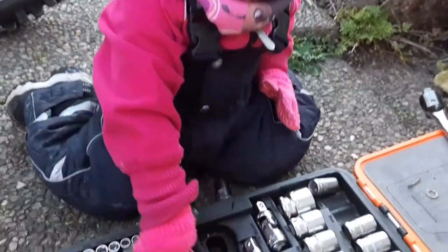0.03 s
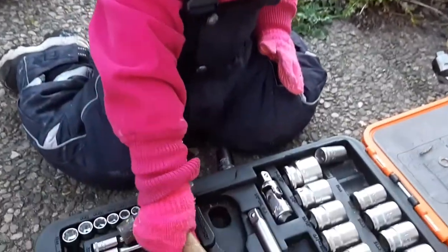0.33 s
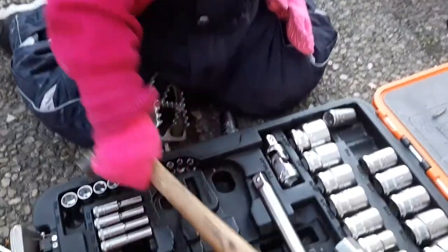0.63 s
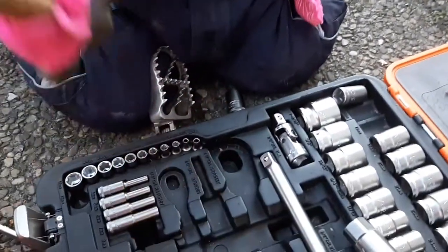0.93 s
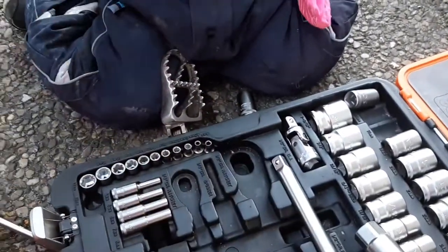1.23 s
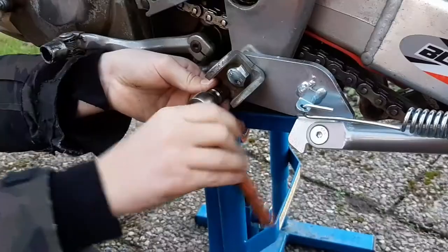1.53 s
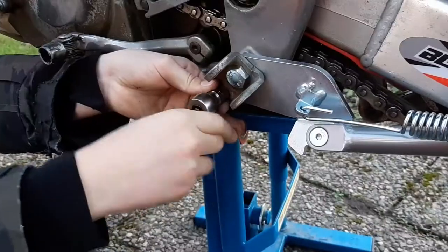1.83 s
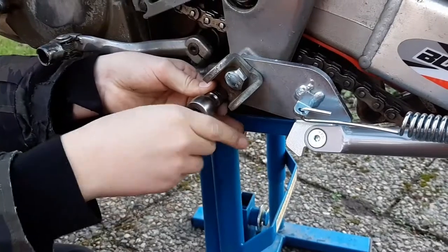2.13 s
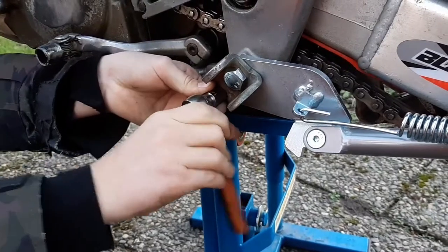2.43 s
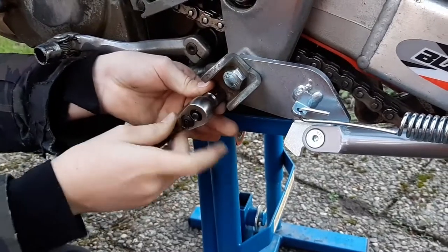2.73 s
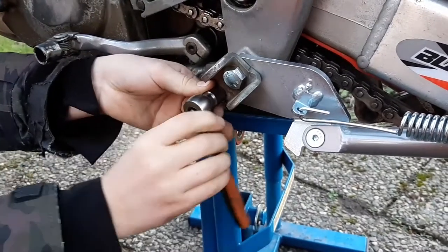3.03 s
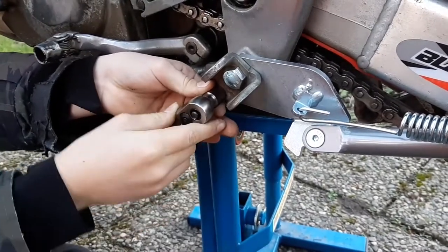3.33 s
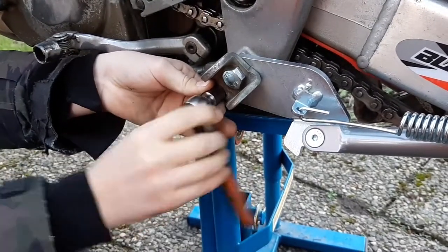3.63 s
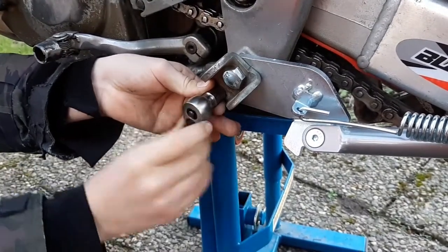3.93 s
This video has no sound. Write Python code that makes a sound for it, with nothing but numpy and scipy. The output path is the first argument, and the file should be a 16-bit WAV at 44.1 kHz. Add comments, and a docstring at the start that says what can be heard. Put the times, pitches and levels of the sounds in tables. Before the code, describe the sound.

A ratchet wrench clicking on a bolt outdoors is the main sound. First, a wooden handle knocks loudly and scrapes in a plastic case until 0.6 seconds, with steel clinks then and near 1.2. From 1.5 a distant engine drones. Quick runs of clicks come at about 1.8, 2.5, 3.2 and 3.9 seconds, the first three with a faintly ringing socket. The wrench knocks once at 3.7.

```python
"""Outdoors on paving, a wooden handle knocks in a plastic socket case, over quiet air and a thin hiss.
Steel pieces clink, the handle scrapes, and more clinks follow. At about 1.5 s the scene changes:
a distant engine drones, and a ratchet wrench on a bolt swings back four times. On each swing its
pawl (a small sprung catch) snaps over the teeth; in the first three a loose socket rings too.
Just before the last swing, the wrench knocks once as it takes up its slack."""
import sys
import numpy as np
from scipy.fft import rfft, irfft, next_fast_len
from scipy.io import wavfile
from scipy.ndimage import map_coordinates

SR = 44100
rng = np.random.default_rng(int(sys.argv[2]) if len(sys.argv) > 2 else 0)


def generate_wav(sig):
    """Save sig (samples, or channels by samples) to the path in sys.argv[1] as 16-bit PCM at SR."""
    pcm = np.round(np.clip(np.atleast_2d(sig).T, -1, 1) * 32767).astype(np.int16)
    wavfile.write(sys.argv[1], SR, pcm)


N = 176400
T = np.arange(SR // 3) / SR  # the clock for one short sound, in seconds


def amp(db):
    """Turn decibels into a number to multiply by."""
    return 10 ** (np.asarray(db) / 20)


def unit(x):
    """Scale a sound to an average strength (rms) of 1."""
    return x / np.sqrt(np.mean(x ** 2) + 1e-20)


def along(points, hz):
    """Read between the rows of a (frequency, value) table, on a log frequency scale."""
    f, value = np.transpose(points)
    return np.interp(np.log(hz + 1), np.log(f + 1), value)


def curve(rows):
    """Join (time, value) rows with straight lines, one value per sample."""
    return np.interp(np.arange(N) / SR, *np.transpose(rows))


def wobble(rate):
    """A smooth curve through `rate` random values a second."""
    values = rng.standard_normal(int(N * rate / SR) + 4)
    return map_coordinates(values, [np.arange(N) * rate / SR])


def filtered(x, response):
    """Multiply each frequency in x by response(frequency)."""
    size = next_fast_len(N + SR // 2)
    hz = np.fft.rfftfreq(size, 1 / SR)
    return irfft(rfft(x, size) * response(hz), size)[..., :N]


def add(out, s, sound):
    """Mix a stereo sound in, starting at s seconds."""
    start = max(0, round(s * SR))
    out[:, start:start + sound.shape[1]] += sound[:, :max(0, N - start)]


def octaves(hz):
    """Count octaves above 1 kHz; everything below 400 Hz counts as 400 Hz."""
    return np.log2(np.maximum(hz, 400) / 1000)


def noise(colour, likeness, pan, tilt=0, size=len(T)):
    """Stereo noise; colour sets how strong each frequency is, tilt brightens it in dB per octave."""
    hz = np.fft.rfftfreq(size, 1 / SR)
    width = np.arccos(np.clip(along(likeness, hz), -1, 1)) / 2  # 0 when both ears hear the same
    spectrum = rfft(rng.standard_normal((2, size))) * amp(along(colour, hz) + tilt * octaves(hz))
    mid, side = spectrum * [np.cos(width), np.sin(width)]
    lean = amp(along(pan, hz) / 2)
    return unit(irfft([(mid + side) * lean, (mid - side) / lean], size))


def fade(t60, attack):
    """The shape of a blow: a quick rise, then a fall of 60 dB in t60 seconds (the ring time)."""
    return np.exp(-np.log(1000) * T / t60) * (1 - np.exp(-T / attack))


def ring(tones, pan, tilt=0):
    """The fading tones of a struck object; higher ones reach the two ears more out of step."""
    hz, db, t60 = np.transpose(tones)
    level, phase, spread = rng.standard_normal((3, len(hz)))
    gain = amp(db + tilt * octaves(hz) + 2 * level)
    side = np.array([[.5], [-.5]])
    out = np.zeros((2, len(T)))
    for f, strength, life, start, gap in zip(hz, gain / np.linalg.norm(gain), t60, phase, spread):
        angle = 2 * np.pi * f * T + np.pi * start + side * gap * min(f / 900, 1.4)
        out += strength * amp(side * along(pan, f)) * np.sin(angle) * fade(life, .0003)
    return out


# Blows on the case: t/s, level/dB, brightness/(dB per octave), extra bass/dB
KNOCKS = [(0.0, -26, -5, -14), (.031, -29.5, -3.5, -3.5), (.064, -15.5, 2.5, 2.5), (.072, -14.5, 3, 4),
          (.0818, -15.5, 2, -1), (0.0886, -13.5, -1, 3), (0.0991, -12.5, 2.6, -2), (.184, -27, -2, 7),
          (0.2395, -28, -1.5, 1), (.345, -49, 1, 0.5), (.383, -40.5, -3.5, -0.5), (0.461, -28.5, 4.5, -8),
          (.476, -32.5, 7.5, -15), (.489, -21.5, 1.5, -3), (0.4973, -26, 1, -2.5), (0.525, -32, 1.5, -9.5),
          (0.5373, -35, 1.5, -9), (0.5846, -36, -6, -3.5)]
# The plastic's clack: f/Hz, level/dB
CLACK_COLOUR = [(60, -25), (130, -19.5), (195, -0.5), (320, 1.5), (900, -4), (2600, -7), (4800, -16.5),
                (5600, -27.5), (6900, -27.5), (7600, -39.5), (10500, -29.5), (12300, -45.5), (15000, -41)]
# The tones its panels ring with: f/Hz, level/dB
PANEL_TONES = [(196, 3), (274, 0), (338, -2), (395, 0.5), (590, -4.5), (744, -2.5), (1038, -8.5),
               (1180, -6), (1343, -7), (1470, -3), (1705, -1), (2458, -3)]
# How alike the case sounds in both ears: f/Hz, likeness (1 = the same)
CASE_LIKENESS = [(250, 0.99), (600, 0.97), (1300, 0.17), (4000, .05)]
# Which way the case's sound leans: f/Hz, left over right/dB
CASE_PAN = [(700, -0.5), (1300, 2.5), (2400, 4), (4400, 0.5), (8000, 1), (15000, 9)]


def case_knocks():
    """Wood hits the plastic case: a crack, a clack, ringing panels and a faint answer from the yard."""
    bass_hz, bright_top_hz = 550, 2800  # extra bass acts below the first; brightening ends at the second
    low_hz = 142  # the knocks carry little sound below this
    out = np.zeros((2, N))
    crack = amp(3) * fade(.0074, .0002)
    body = fade(.079, .00072)
    answer = amp(-20.5) * fade(.3, .01)
    for s, db, tilt, bass_db in KNOCKS:
        bass = lambda hz: bass_db / (1 + (hz / bass_hz) ** 4)
        # higher tones die away sooner
        panels = [(hz, level + bass(hz), .12 * (1000 / hz) ** .34) for hz, level in PANEL_TONES]
        colour = [(hz, level + bass(hz) + tilt * octaves(min(hz, bright_top_hz)))
                  for hz, level in CLACK_COLOUR]
        clack = amp(-1.5) * noise(colour, CASE_LIKENESS, CASE_PAN) * (body + crack + answer)
        add(out, s, amp(db) * (clack + amp(-3) * ring(panels, CASE_PAN, tilt)))
    return filtered(out, lambda hz: (hz / low_hz) ** 2 / np.sqrt(1 + (hz / low_hz) ** 4))


# Quiet outdoor air: f/Hz, level/dB
AIR_COLOUR = [(30, -33), (98, 0.5), (125, -17.5), (195, 0), (500, -31), (15500, -27)]
# How loud the thin hiss is: t/s, level/dB
HISS_LEVEL = [(0, -50.5), (.5, -63.5), (.75, -77), (1.05, -75.5), (1.25, -56.5), (1.45, -53)]
# What the hiss is made of: f/Hz, level/dB
HISS_COLOUR = [(300, -2.5), (15500, -15.5)]
# How alike open-air sounds are in both ears: f/Hz, likeness (1 = the same)
AIR_LIKENESS = [(60, 0.94), (250, 1), (600, 0.37), (1500, 0.2), (4000, 0.15)]
# Which way the air, the pings and the wrench lean: f/Hz, left over right/dB
OPEN_PAN = [(700, 1.5), (2400, 0.5), (4400, -2.5), (8000, -3.5), (15000, 6)]


def yard_air():
    """Still air around the case, and a thin hiss that sinks away and comes back."""
    air = amp(-64 + 1.5 * wobble(6.7)) * noise(AIR_COLOUR, AIR_LIKENESS, OPEN_PAN, size=N)
    hiss = amp(curve(HISS_LEVEL)) * noise(HISS_COLOUR, AIR_LIKENESS, CASE_PAN, size=N)
    return air + hiss


def ping(hz):
    """A light touch of steel on steel rings briefly and roughly around one pitch."""
    width = .045  # as a share of the pitch
    band = [(hz * (1 + step * width), db) for step, db in [(-4, -40), (-1, 0), (1, 0), (4, -40)]]
    return noise(band, AIR_LIKENESS, OPEN_PAN) * fade(.025, .0004)


# Steel pieces meet: t/s, level/dB, brightness/(dB per octave), clash length/s, piece, ring over clash/dB
CLINKS = [(.07, -13.5, 8.5, 0.028, "bar", -19), (0.082, -24, 3.5, .079, "bar", -8),
          (.444, -23.5, -8.5, 0.042, "bar", 0), (1.1717, -36, -1, 0.044, "socket", -9),
          (1.176, -21.5, -1, 0.026, "socket", 1), (1.183, -27, -2.5, 0.04, "socket", 3.5),
          (1.318, -52, -10.5, 0.063, "bar", 0), (1.407, -49.5, -13, 0.05, "bar", -5)]
# The noisy clash: f/Hz, level/dB
CLASH_COLOUR = [(1000, -37), (1900, -9.5), (3000, -3), (4800, -4), (6500, 0.5), (7400, -11.5),
                (11000, -7.5), (12500, -19.5), (15000, -20.5)]
# The tones of a "socket" and of a "bar": f/Hz, level/dB, ring time/s
STEEL_TONES = {"socket": [(1826, -13, 0.056), (3044, -2, 0.059), (3750, -8.5, 0.052), (6660, 2, 0.054),
               (8193, 6.5, 0.055), (11780, -4.5, 0.065)], "bar": [(3080, 3, .05), (5600, -7, .03),
               (6379, -3, 0.049), (8700, -8, 0.066), (10530, -8.5, 0.16)]}


def steel_clinks():
    """Steel hits steel; each piece rings with its own tones, cut short by the plastic tray."""
    out = np.zeros((2, N))
    for s, db, tilt, t60, piece, ring_db in CLINKS:
        shape = fade(t60, .00043) + amp(-21.5) * fade(.23, .005)
        clash = noise(CLASH_COLOUR, CASE_LIKENESS, CASE_PAN, tilt) * shape
        ringing = amp(ring_db) * ring(STEEL_TONES[piece], CASE_PAN, tilt)
        add(out, s, amp(db) * (clash + ringing))
    add(out, 1.152, amp(-42) * ping(hz=5000))  # a socket ticks lightly before its clink
    return out


# How loud the dragging handle is: t/s, level/dB
SCRAPE_LEVEL = [(.33, -58), (.375, -51.5), (.405, -34.5), (.48, -35), (.512, -51), (.6, -57.5), (.63, -77)]
# Wood rubbing on plastic: f/Hz, level/dB
SCRAPE_COLOUR = [(100, -36.5), (300, -5.5), (545, -1.5), (880, -17), (2400, -16.5), (4780, -24),
                 (7500, -49.5)]


def handle_scrape():
    """The handle drags over the plastic in many small slips."""
    slips = unit(amp(1.4 * wobble(260)))
    dragging = np.arange(N) / SR < SCRAPE_LEVEL[-1][0]
    rubbing = noise(SCRAPE_COLOUR, CASE_LIKENESS, CASE_PAN, size=N)
    return amp(curve(SCRAPE_LEVEL)) * slips * dragging * rubbing


# Far-off traffic noise: f/Hz, level/dB
TRAFFIC_COLOUR = [(25, -33), (54, -19), (110, -7.5), (225, -1.5), (380, -13.5), (850, -18), (1240, -13),
                  (1550, -21), (2230, -23.5), (5400, -40.5), (15500, -54.5)]
# How its low rumble rises and falls: t/s, relative level/dB
RUMBLE_LEVEL = [(1.48, -42.5), (3.2, -42), (4, -45)]
# How loud the rush of the road is: t/s, level/dB
RUSH_LEVEL = [(1.46, -48.5), (1.9, -45.5), (2.55, -45), (3.5, -50.5)]
# How loud the engine's note is: t/s, level/dB
DRONE_LEVEL = [(1.46, -43.5), (2.3, -42), (3.25, -42), (4, -55.5)]
# How loud the high hiss is: t/s, level/dB
FIZZ_LEVEL = [(2.3, -74), (2.9, -62.5), (3.4, -59), (3.65, -65.5), (3.8, -52), (4, -66.5)]


def distant_traffic():
    """A far engine drones on one wavering note, over rumble, road rush and a high hiss."""
    drone_hz, lag_s = 164, .00043  # the traffic is to the left, so the right ear hears it later
    traffic = noise(TRAFFIC_COLOUR, AIR_LIKENESS, pan=[(200, -.83), (2000, -.19)], size=N)
    low = filtered(traffic, lambda hz: 1 / (1 + (hz / 450) ** 4))
    fizz = noise([(2000, -6), (4000, 1), (15000, -4.5)], AIR_LIKENESS, OPEN_PAN, size=N)
    drone_gain = amp(curve(DRONE_LEVEL) + 1.9 * wobble(16))
    pitch_hz = drone_hz * (1 + .0701 * wobble(30))
    drone = drone_gain * np.sin(2 * np.pi * np.cumsum(pitch_hz) / SR)
    rumble = amp(curve(RUMBLE_LEVEL) - 1) * unit(low)
    rush = amp(curve(RUSH_LEVEL) + .66 * wobble(15)) * unit(traffic - low)
    ear_delay = lambda hz: np.exp(1j * np.pi * lag_s * np.array([hz, -hz]))
    return filtered(rumble + drone + rush, ear_delay) + amp(curve(FIZZ_LEVEL)) * fizz


# The pawl drops off a tooth, in four runs of clicks: t/s, level/dB
CLICKS = [(1.788, -32), (1.7993, -29), (1.8102, -33), (1.8211, -28), (1.832, -31), (1.8429, -33.5),
          (1.8543, -27), (1.87, -29.5), (1.8907, -28), (1.911, -29.5), (1.9279, -29), (1.943, -29.5),
          (1.9577, -31), (2.489, -34.5), (2.5061, -32.5), (2.5238, -32.5), (2.5416, -32), (2.555, -32),
          (2.5664, -31.5), (2.5758, -29.5), (2.5862, -27), (2.5954, -31), (2.6051, -32), (2.613, -29),
          (3.2134, -31.5), (3.2245, -28.5), (3.235, -25.5), (3.2448, -30), (3.2545, -26), (3.2631, -26.5),
          (3.2739, -29), (3.283, -26.5), (3.2933, -27), (3.3031, -32.5), (3.3236, -31), (3.888, -31.5),
          (3.9042, -35), (3.918, -33), (3.9324, -29.5), (3.9472, -29), (3.9602, -30.5), (3.9725, -28),
          (3.9847, -33.5), (3.998, -26)]
# The pawl's tip: f/Hz, level/dB
TIP_COLOUR = [(1500, -16.5), (3000, -4), (5000, -2), (8000, -3.5), (11200, -5.5), (12500, -12.5),
              (15500, -9.5)]
# The clack of the wrench's head: base f/Hz, level/dB
HEAD_COLOUR = [(600, -14), (2100, -7.5), (3100, -3.5), (3800, 0), (4400, -12), (5200, -6), (7500, -11),
               (15000, -23.5)]
# The tones the head rings with: base f/Hz, level/dB, ring time/s
HEAD_TONES = [(3120, -4, 0.041), (3333, -0.5, 0.032), (3784, -2, 0.036), (6560, -6.5, 0.05)]
# The grip shifts the head's pitch: t/s, pitch multiplier
GRIP_PITCH = [(1.79, .74), (1.86, 1.0), (2.62, 1.07), (3.22, 0.78), (3.26, 1.0), (4, 1.07)]


def pawl_clicks():
    """At each tooth the pawl slides, snaps off brightly, then lands and rings the wrench's head."""
    out = np.zeros((2, N))
    for s, db in CLICKS:
        grip = np.interp(s, *np.transpose(GRIP_PITCH))
        pitch = grip * np.exp(.04 * rng.normal())  # about 4 % of variety from tooth to tooth
        head = [(hz * pitch, level) for hz, level in HEAD_COLOUR]
        tones = [(hz * pitch, level, t60) for hz, level, t60 in HEAD_TONES]
        slide = amp(-6) * noise(TIP_COLOUR, AIR_LIKENESS, OPEN_PAN) * fade(.019, .0009)
        brightness = rng.normal(0, 1.2)
        snap = amp(3.5) * noise(TIP_COLOUR, AIR_LIKENESS, OPEN_PAN, brightness) * fade(.016, .00041)
        landing = amp(-.5) * noise(head, AIR_LIKENESS, OPEN_PAN) * fade(.014, .0004)
        tail = amp(-12.5) * noise(head, AIR_LIKENESS, OPEN_PAN, tilt=1.5) * fade(.13, .002)
        ringing = amp(-1) * ring(tones, OPEN_PAN)
        add(out, s - .0022, amp(db) * slide)
        add(out, s - .0003, amp(db) * snap)
        add(out, s + .0009, amp(db) * (landing + tail + ringing))
    return out


# Teeth that catch: t/s, f/Hz, level/dB
CATCHES = [(1.7993, 4140, -30), (1.8915, 4850, -27), (3.888, 6050, -29.5), (3.9042, 6040, -33.5),
           (3.9472, 4174, -27.5), (3.998, 4450, -31.5)]


def tooth_catches():
    """Now and then a tooth catches on its edge and adds a short ping."""
    out = np.zeros((2, N))
    for s, hz, db in CATCHES:
        add(out, s, amp(db) * ping(hz))
    return out


# The socket is set ringing: t/s, level/dB
SOCKET_RINGS = [(1.893, -34), (1.958, -38.5), (2.587, -36), (2.613, -42), (3.255, -48), (3.324, -42)]
# Its tones: f/Hz, level/dB, ring time/s
SOCKET_TONES = [(3690, -11, 0.36), (6670, -1, 0.16), (6820, -2.5, 0.14)]


def loose_socket():
    """The socket sits loosely on the wrench, so it rings on after a click."""
    out = np.zeros((2, N))
    for s, db in SOCKET_RINGS:
        add(out, s, amp(db) * ring(SOCKET_TONES, OPEN_PAN))
    return out


# The wrench's knock: f/Hz, level/dB
SLACK_COLOUR = [(400, -12.5), (860, -2), (1400, -13), (1850, -8), (3300, 3), (3900, -6), (4600, -16),
                (15000, -33.5)]
# The tones of the bolt and its bracket: f/Hz, level/dB, ring time/s
BOLT_TONES = [(637, -8, 0.18), (1040, -6, 0.24), (1896, -4, 0.14), (3760, -8, 0.3)]


def slack_knock():
    """The wrench takes up its slack with one knock, and the bolt and bracket ring faintly."""
    out = np.zeros((2, N))
    knock = noise(SLACK_COLOUR, AIR_LIKENESS, OPEN_PAN) * fade(.049, .00061)
    ringing = amp(-17) * ring(BOLT_TONES, OPEN_PAN)
    add(out, 3.7035, amp(-25.5) * (knock + ringing))
    return out


def scene():
    """First the socket case in the yard, then the wrench with traffic behind it."""
    change_s, blend_s = 1.458, .005
    later = np.clip((np.arange(N) / SR - change_s) / blend_s, 0, 1)
    at_case = case_knocks() + yard_air() + steel_clinks() + handle_scrape()
    traffic = distant_traffic()
    wrench = pawl_clicks() + tooth_catches() + loose_socket() + slack_knock()
    return (1 - later) * at_case + later * traffic + wrench


def record(dry):
    """Cut off the very highest treble, above 15.8 kHz."""
    return filtered(dry, lambda hz: hz < 15800)


dry = scene()
out = record(dry)
generate_wav(out)
```